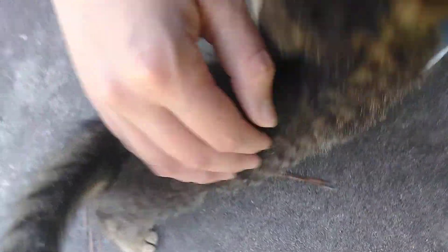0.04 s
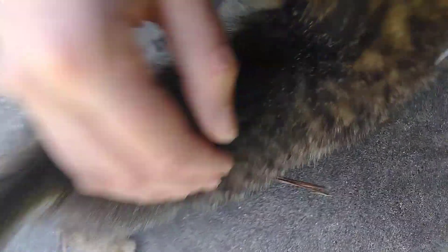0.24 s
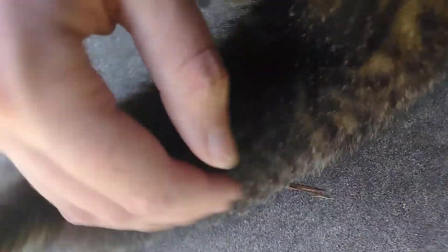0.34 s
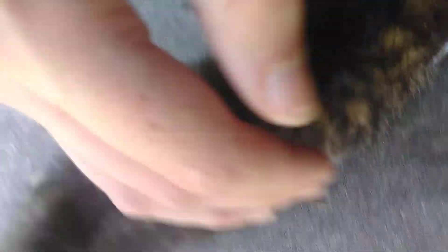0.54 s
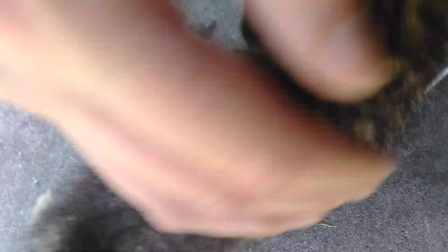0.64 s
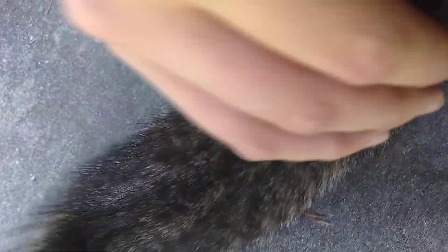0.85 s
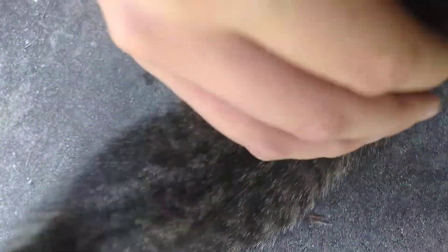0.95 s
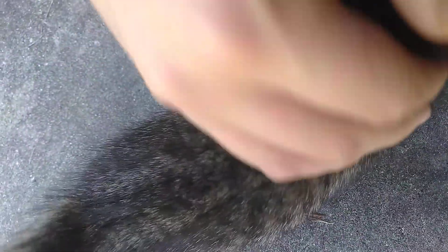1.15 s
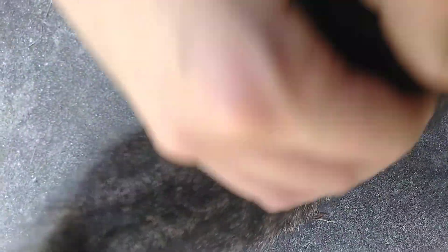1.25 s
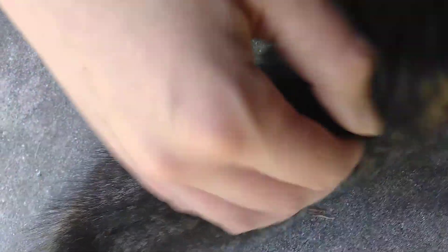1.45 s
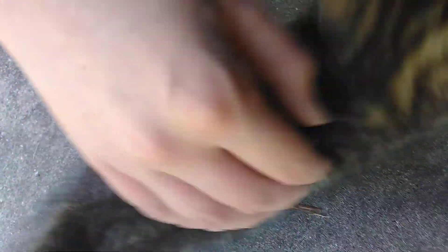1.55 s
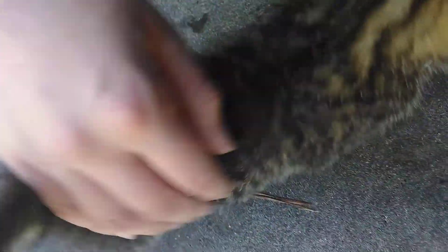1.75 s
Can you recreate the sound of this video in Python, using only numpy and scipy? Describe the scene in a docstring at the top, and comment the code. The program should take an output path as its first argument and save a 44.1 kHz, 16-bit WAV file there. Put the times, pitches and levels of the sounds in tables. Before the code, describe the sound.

A hand rubbing a cat's fur right beside the microphone: two quick firm pushes with hollow scuffs, hair hiss and sharp little clicks, then much quieter light strokes, soft handling knocks and faint outdoor rumble.

```python
"""Hand rubbing a cat's fur

Right beside the microphone: one firm rub in two pushes, then a string of light strokes.
Dense random slips, coloured and ringing, give a hollow scuff and a fine hair hiss; fingertips add low scrapes.
Single hairs snap free as decaying high clicks. Soft handling knocks are short low sines.
Shaped noise makes the faint outdoor rumble underneath."""
import sys
import numpy as np
from scipy import signal
from scipy.fft import rfft, irfft
from scipy.io import wavfile
from scipy.ndimage import uniform_filter1d

SR = 44100
rng = np.random.default_rng(int(sys.argv[2]) if len(sys.argv) > 2 else 0)


def inscribe(sig):
    """Save sig as 16-bit PCM at rate SR to the path in sys.argv[1].

    A 1-D sig is mono; a 2-D sig holds one channel per row.
    Samples are clipped to [-1, 1] before scaling.
    """
    pcm = np.round(np.clip(np.atleast_2d(sig).T, -1, 1) * 32767)
    wavfile.write(sys.argv[1], SR, pcm.astype(np.int16))


N = 79380
T = np.arange(N) / SR
HZ = np.maximum(np.fft.rfftfreq(N, 1 / SR), 1)

# hiss colour of lightly touched hairs: f/Hz, level/dB
LIGHT_HISS_COLOUR = [(1500, -23.5), (3300, -11), (4700, -8), (5400, -3), (8000, -3), (11000, 2),
                     (13000, -4.5), (15500, -10.5)]

SCUFF_SLIPS_PER_S, SCUFF_SPREAD_DB = 2400, 3
HAIR_SLIPS_PER_S = 14000


def undb(db):
    """Decibels to linear gain."""
    return 10 ** (np.asarray(db) / 20)


def unit(x):
    """Scale to an rms of 1."""
    return x / np.sqrt(np.mean(x ** 2))


def curve(rows):
    """Gain over time, drawn in straight dB lines through (t/s, level/dB) points."""
    s, db = np.array(rows).T
    return undb(np.interp(T, s, db, right=-120))


def colour(x, points, rings=()):
    """Shape a spectrum by (f/Hz, level/dB) points and add resonances; rms 1."""
    hz, db = np.array(points).T
    gain = undb(np.interp(np.log(HZ), np.log(hz), db))
    lift = 1
    for centre_hz, width_hz, ring_db in rings:
        lift = lift + undb(ring_db) / (1 + 2j * (HZ - centre_hz) / width_hz)
    return unit(irfft(rfft(x) * gain * lift, N))


def walk(rate):
    """Smooth random wander with an rms of 1: random steps at the given rate, averaged twice."""
    k = max(int(SR / rate), 1)
    steps = rng.standard_normal(N)[np.arange(N) // k]
    once = uniform_filter1d(steps, k)
    return unit(uniform_filter1d(once, k))


def slips(rate, spread_db):
    """Dense tiny slips of uneven size and random sign, swayed as the grip catches and eases."""
    grip_steps_per_s, grip_db = 127.9, 0.95
    hit = rng.random(N) < rate / SR
    size = undb(spread_db * np.clip(rng.standard_normal(N), -2, 2))
    sign = np.sign(rng.standard_normal(N))
    grip = undb(grip_db * walk(grip_steps_per_s))
    return hit * size * sign * grip


def outdoors():
    """Distant rumble: noise with a low-heavy spectrum whose level wavers slightly."""
    # outdoor background spectrum: f/Hz, relative density/dB per Hz
    outdoor_colour = [(15, -3), (30, -5), (55, 2), (85, -2), (130, -5.5), (200, -8), (300, -12),
                      (450, -16.5), (700, -27.5), (1050, -26.5), (1800, -32.5), (3000, -38.5), (5000, -43),
                      (7500, -41), (10500, -36), (13000, -41.5), (16000, -52.5)]
    level_db = -61 + 0.41 * walk(7.9)
    return colour(rng.standard_normal(N), outdoor_colour) * undb(level_db)


def bumps():
    """Soft handling knocks: low sines that swell quickly and die away."""
    # knocks of the hand holding the recorder: start t/s, envelope peak/dB, f/Hz
    bump_list = [(0.221, -51.5, 86.1), (0.842, -61.5, 250), (1.361, -56, 191), (1.682, -53.5, 189)]
    rise_s = .007
    out = np.zeros(N)
    for s, db, hz in bump_list:
        age = np.maximum(T - s, 0)
        envelope = age / rise_s * np.exp(1 - age / rise_s)  # peaks at 1 after rise_s
        out += undb(db) * envelope * np.sin(2 * np.pi * hz * age)
    return out


def drags():
    """Fingertips drag on the skin under the fur: slips in a low band, swelling and fading."""
    # low scrapes: centre t/s, half length to 1/e/s, level/dB, centre f/Hz
    drag_list = [(0.006, 0.0065, -62, 464), (0.086, 0.0047, -53, 730), (0.249, 0.014, -51.5, 515),
                 (0.313, 0.0082, -45.5, 635), (0.34, 0.008, -52.5, 430), (0.379, .009, -50, 398),
                 (0.588, 0.024, -58.5, 540), (0.645, .006, -53, 584), (0.675, 0.0092, -62, 500),
                 (0.897, .012, -71, 504), (1.072, 0.024, -69.5, 425), (1.29, 0.059, -65, 340),
                 (1.52, 0.02, -70, 620)]
    log_width = 0.36  # about this share of the centre frequency, either side
    out, source = np.zeros(N), rfft(slips(SCUFF_SLIPS_PER_S, spread_db=0.5))
    for s, half, db, hz in drag_list:
        band = np.exp(-(np.log(HZ / hz) / log_width) ** 2)
        scrape = unit(irfft(source * band, N))
        out += undb(db) * scrape * np.exp(-((T - s) / half) ** 2)
    return out


def light_strokes():
    """Fingers glide over the coat: each stroke swells, holds and dies away, with a colour of its own."""
    # light strokes: start t/s, attack/s, hold/s, decay to 1/e/s, scuff level/dB, hiss level/dB,
    # scuff focus f/Hz, hiss low-pass corner f/Hz
    stroke_list = [(0.795, 0.02, 0.041, .02, -77.5, -95.5, 1897, 8000),
                   (0.863, 0.031, 0.0028, 0.015, -68, -63, 2000, 8040),
                   (1.052, 0.042, 0.044, .038, -69, -55.5, 2170, 17000),
                   (1.116, 0.0098, .004, 0.0044, -69, -69, 2250, 10000),
                   (1.232, 0.028, 0.037, 0.036, -63.5, -57.5, 2320, 16000),
                   (1.257, 0.017, 0.035, 0.013, -62, -78, 1410, 9000),
                   (1.399, .024, 0.0026, .007, -65, -73, 1310, 8000),
                   (1.383, .055, 0.023, .026, -63.5, -77, 2400, 8900),
                   (1.474, 0.027, 0.024, 0.012, -73.5, -94, 2800, 9000),
                   (1.694, .006, 0.0018, .005, -74.5, -87, 1500, 11000),
                   (1.742, 0.0044, .006, 0.0057, -79, -83, 1500, 12060)]
    # scuff colour of a light touch: f/Hz, level/dB
    light_scuff_colour = [(200, -12), (450, 4), (900, -8), (1130, 3), (1450, -5.5), (2250, -4.5),
                          (3250, -12), (3750, -11.5), (7000, -40)]
    focus_width_oct, focus_db = 0.65, 8.5
    source = rfft(slips(SCUFF_SLIPS_PER_S, SCUFF_SPREAD_DB))
    hairs = rfft(colour(slips(HAIR_SLIPS_PER_S, spread_db=6), LIGHT_HISS_COLOUR))
    out = np.zeros(N)
    for start, attack, hold, decay, scuff_db, hiss_db, hz, top_hz in stroke_list:
        focus = undb(focus_db * np.exp(-(np.log2(HZ / hz) / focus_width_oct) ** 2))
        scuff = colour(irfft(source * focus, N), light_scuff_colour)
        hiss = irfft(hairs / np.sqrt(1 + (HZ / top_hz) ** 10), N)
        rise = np.clip((T - start) / attack, 0, 1) ** 1.2
        fade = np.exp(-np.maximum(T - start - attack - hold, 0) / decay)
        out += rise * fade * (undb(scuff_db) * scuff + undb(hiss_db) * hiss)
    return out


def hair_ticks():
    """Each hair snaps free in a sharp click: a high sine that dies within a cycle or two."""
    # hairs snapping free: t/s, peak before the common lift/dB, centre f/Hz
    tick_list = [ (0.3056, -17, 10500), (0.3064, -15, 9500), (0.3073, -20, 10500), (0.3084, -9.3, 9500),
                 (0.3784, -24.5, 4500), (0.4209, -25.5, 8600), (0.4310, -31, 6600), (0.4606, -31, 11400),
                 (0.4647, -35, 11500), (0.4660, -33, 11500), (0.4674, -24, 11900), (0.47, -49, 11500),
                 (0.476, -30, 12100), (0.4936, -33, 12000), (0.5028, -42, 12000), (0.5162, -25.5, 10800),
                 (0.5345, -28, 10300)]
    decay_s, lift_db = .00007, 2
    out = np.zeros(N)
    for s, db, hz in tick_list:
        age = np.maximum(np.arange(N) - int(s * SR), 0) / SR
        click = np.exp(-age / decay_s) * np.sin(2 * np.pi * hz * age)
        edge = np.gradient(click)  # the slope sharpens the onset
        out += undb(db + lift_db) * edge / np.abs(edge).max()
    return out


def firm_rub():
    """Fur pressed and dragged close by: slips ring a hollow scuff; the hair hiss fills out under pressure."""
    # scuff level, one list for each push: t/s, level/dB
    scuff_pushes = [
        [(0.0, -74), (0.01, -77.5), (0.05, -80), (0.086, -58.5), (0.108, -71.5), (0.154, -54.5), (0.16, -47),
         (0.22, -47), (0.23, -41), (0.308, -36), (0.334, -51.5), (0.346, -38), (0.36, -47), (0.38, -33),
         (0.412, -56.5), (0.422, -50.5), (0.45, -63)],
        [(0.45, -69), (0.46, -58), (0.486, -53), (0.5, -61), (0.532, -49), (0.55, -58.5), (0.568, -39.5),
         (0.602, -49), (0.652, -52), (0.664, -65), (0.676, -60), (0.686, -73.5), (0.784, -72), (0.8, -79)],
    ]
    # hair hiss level: t/s, level/dB
    hiss_points = [(0.04, -90), (0.085, -68), (0.105, -75), (0.14, -63), (0.168, -53), (0.218, -51.5),
                   (0.25, -39), (0.29, -32), (0.306, -30.5), (0.319, -37), (0.325, -47), (0.345, -42.5),
                   (0.364, -48.5), (0.382, -45), (0.41, -52.5), (0.436, -57.5), (0.452, -70), (0.475, -55),
                   (0.51, -55.5), (0.53, -49.5), (0.555, -50), (0.572, -39.5), (0.605, -50.5), (0.69, -63),
                   (0.76, -72), (0.8, -91.5)]
    # hollow colour of the scuff: f/Hz, level/dB
    firm_scuff_colour = [(200, -40), (430, -18), (540, -10.5), (660, -4.5), (1000, -0.5), (1300, -4),
                         (1900, -2.5), (2800, -6), (3600, -16), (6000, -33.5)]
    # scuff resonances: centre f/Hz, width/Hz, added ring relative to the colour/dB
    scuff_resonances = [(754, 40, -3.5), (1020, 60, -5), (1465, 76, -6), (1850, 200, -11)]
    # fuller hiss of pressed hairs: f/Hz, level/dB
    pressed_hiss_colour = [(900, -20.5), (2200, -13), (3300, 2), (4400, 3), (5500, 0.5), (8000, 0),
                           (10700, -1), (12500, -3.5), (15500, -12.5)]
    # resonances of the pressed hairs: centre f/Hz, width/Hz, added ring relative to the colour/dB
    hair_resonances = [(7450, 200, -11.5), (8500, 200, -6), (10050, 250, 0), (11300, 200, -4)]
    firm_hiss_db, firm_range_db = -50.5, 4.5  # midpoint and softness of the blend into the pressed colour

    scuff = colour(slips(SCUFF_SLIPS_PER_S, SCUFF_SPREAD_DB), firm_scuff_colour, scuff_resonances)
    hairs = slips(HAIR_SLIPS_PER_S, spread_db=7.5)
    hiss_level = curve(hiss_points)
    pressed = 1 / (1 + np.exp((firm_hiss_db - 20 * np.log10(hiss_level)) / firm_range_db))
    pressed_hiss = colour(hairs, pressed_hiss_colour, hair_resonances)
    light_hiss = colour(hairs, LIGHT_HISS_COLOUR)
    hiss = pressed * pressed_hiss + (1 - pressed) * light_hiss
    return scuff * curve(np.vstack(scuff_pushes)) + hiss * hiss_level


def scene():
    """Mix the background, handling and fur layers into one channel."""
    background = outdoors() + bumps()
    fur = drags() + light_strokes() + hair_ticks() + firm_rub()
    return (background + fur)[None]


def record(dry):
    """The recorder cuts the top steeply."""
    top_hz = 15750
    low_pass = signal.ellip(10, .2, 80, top_hz, fs=SR, output="sos")  # 0.2 dB ripple, 80 dB stop
    return signal.sosfilt(low_pass, dry)


dry = scene()
out = record(dry)
inscribe(out)
```